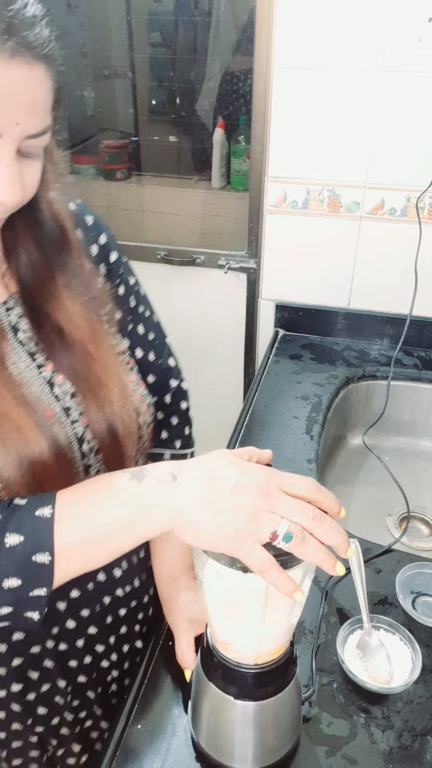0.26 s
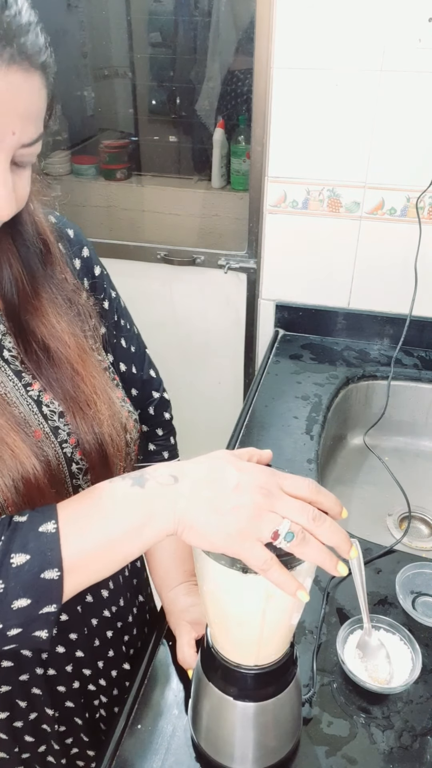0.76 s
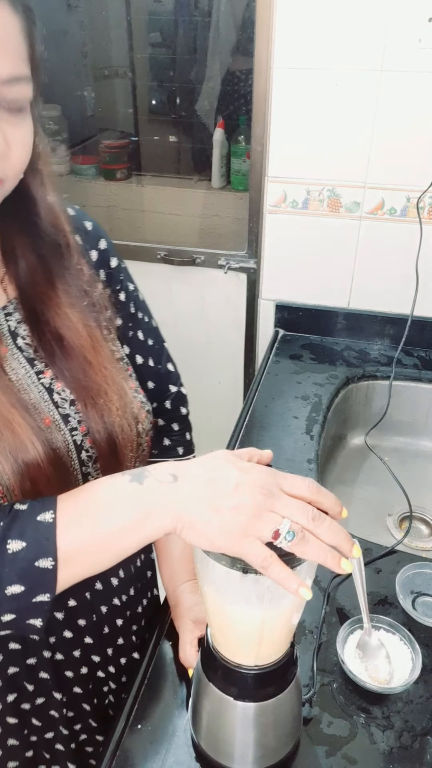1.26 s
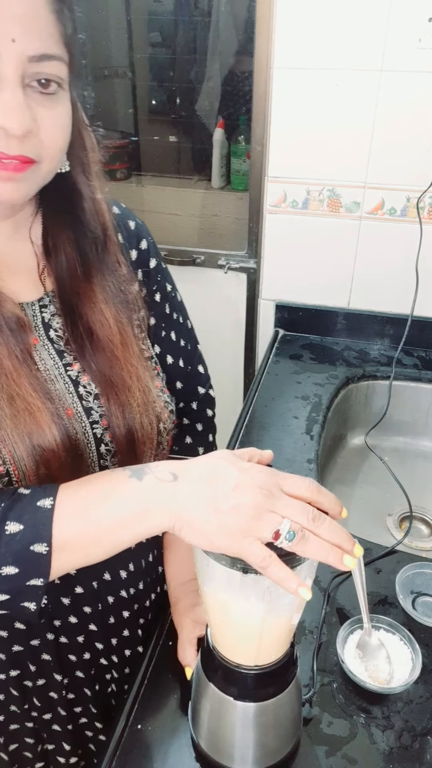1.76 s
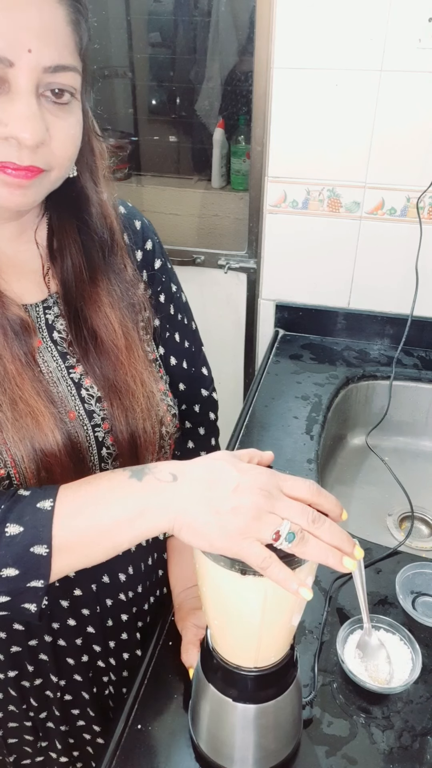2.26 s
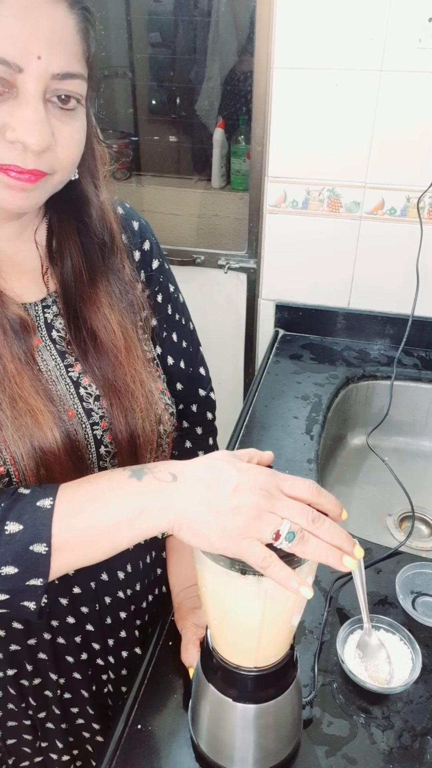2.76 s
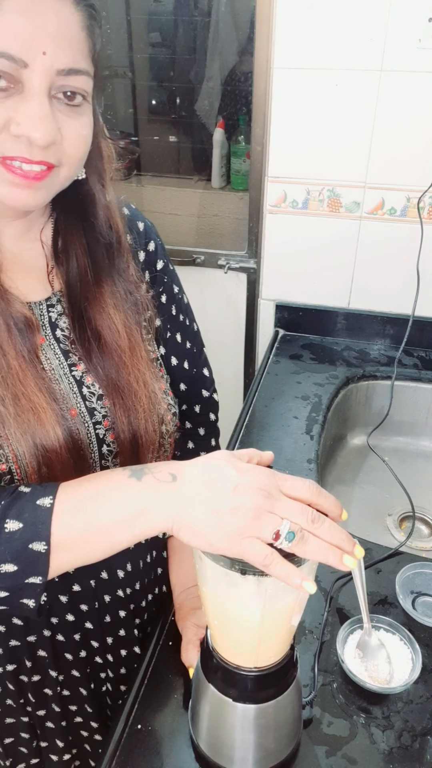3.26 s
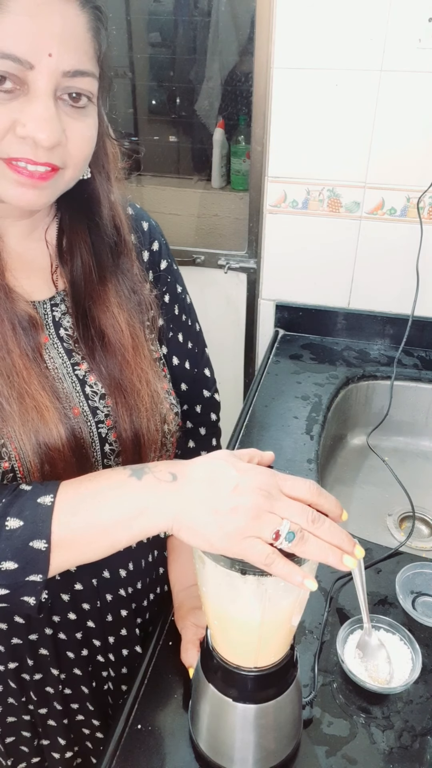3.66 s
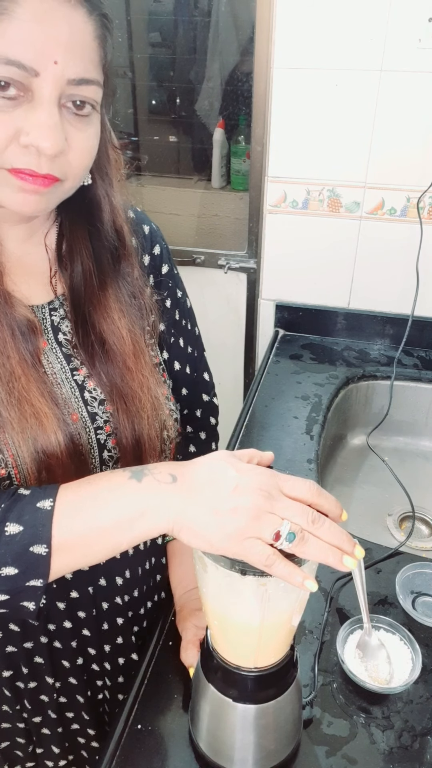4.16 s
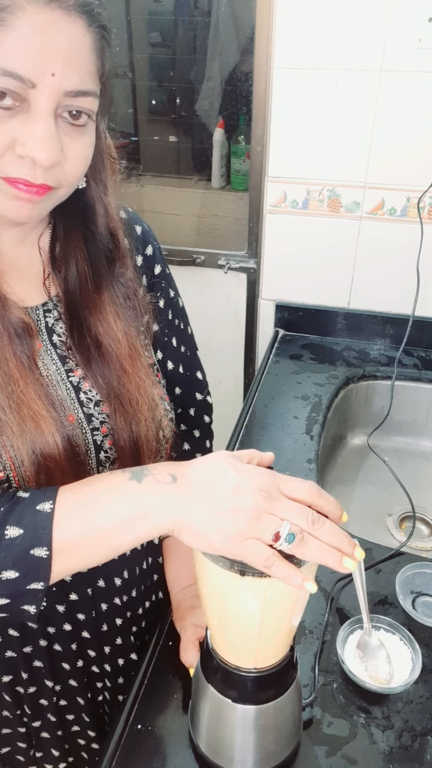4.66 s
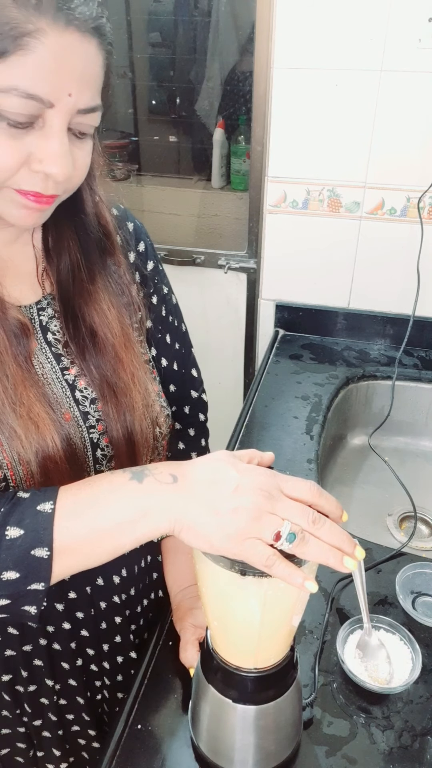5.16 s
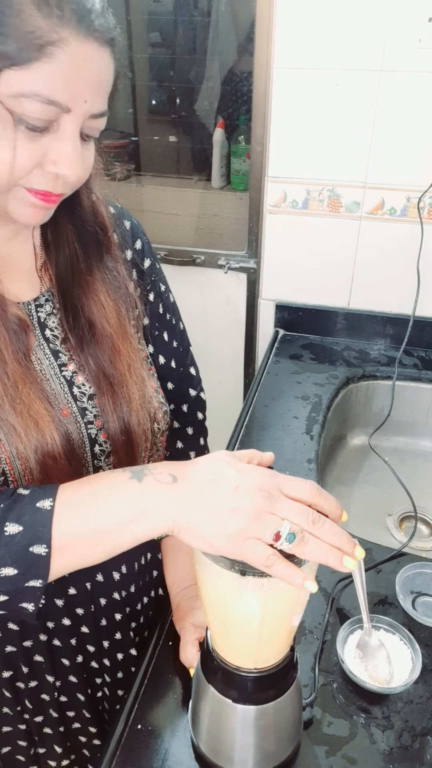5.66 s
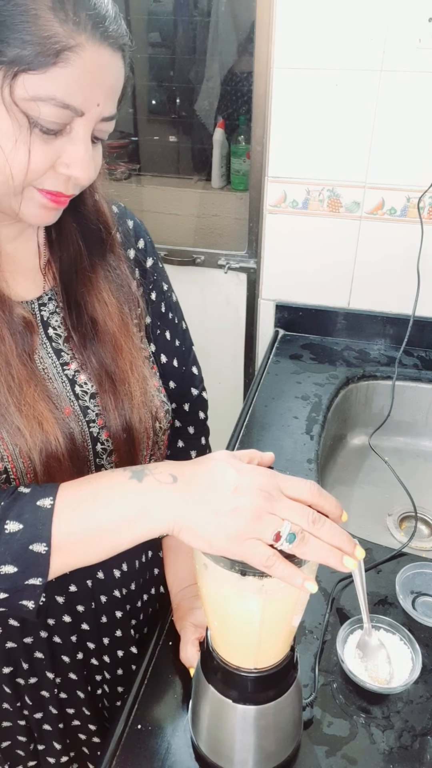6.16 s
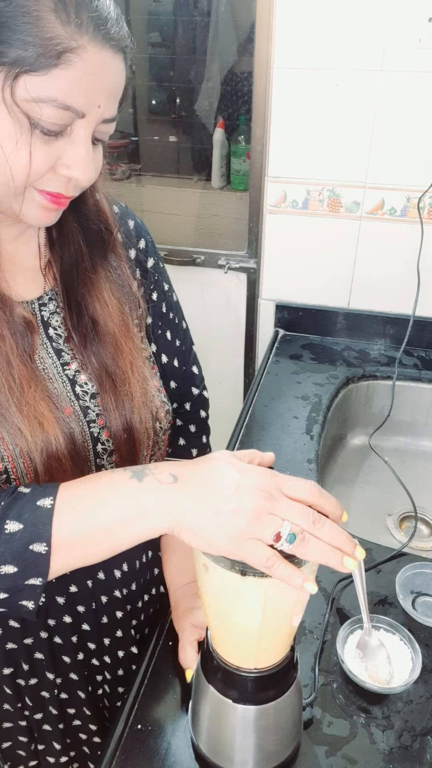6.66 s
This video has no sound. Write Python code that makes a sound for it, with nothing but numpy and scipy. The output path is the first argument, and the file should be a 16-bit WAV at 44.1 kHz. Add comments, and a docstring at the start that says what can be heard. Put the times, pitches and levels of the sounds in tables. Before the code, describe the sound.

Repeated bursts of a blender: gritty, liquid roar with a whining motor, lumps knocking the jar, and rumbling coast-downs between presses.

```python
"""In a small tiled kitchen a blender on a stone counter is switched on five times, coasting after each press.
The shaft hums and whines at multiples of its speed; the blades churn the jar as surging, coloured noise.
Lumps knock the jar wall as short bursts, the loose base rumbles and lands with dull rings, the fan hisses.
Tile echoes and a faint house murmur lie behind; two microphone ports stand a few centimetres apart."""
import sys
import numpy as np
from scipy import signal
from scipy.fft import rfft, irfft, next_fast_len
from scipy.io import wavfile
from scipy.ndimage import uniform_filter1d

SR = 44100
rng = np.random.default_rng(int(sys.argv[2]) if len(sys.argv) > 2 else 0)


def unload_audio(sound):
    """Save the sound as a 16-bit wav file, at the path given as the first command line argument."""
    columns = np.transpose(np.atleast_2d(sound))
    # keep every value between -1 and 1, then stretch to whole-number steps
    steps = np.round(np.clip(columns, -1, 1) * 32767)
    wavfile.write(sys.argv[1], SR, steps.astype(np.int16))


N = 304731

# Shaft speed while the switch is held, one table a press. Each row: time in seconds, speed in turns per s.
SHAFT_SPEED = [
    [(0.6, 50), (0.74, 145), (0.79, 188), (0.88, 200), (0.95, 196), (1.04, 202), (1.16, 209), (1.21, 225)],
    [(2.05, 61), (2.16, 123), (2.3, 162), (2.39, 223), (2.46, 194), (2.58, 224), (2.86, 235), (2.95, 225),
     (2.99, 214), (3.11, 223)],
    [(4.335, 60), (4.44, 95)],
    [(4.65, 56), (4.71, 130), (4.79, 163), (4.9, 212), (5.0, 223), (5.16, 232), (5.53, 235), (5.83, 230),
     (5.99, 236), (6.04, 224)],
    [(6.855, 57), (6.91, 120)],
]
# Drag of the coasting shaft. One value a press: share of the speed lost per turn.
COAST_DRAG = [.014, .016, .012, .012, .012]
# Load offsets, one row a press: base under power, base coasting, fan under power, fan coasting,
# counter under power, counter coasting, all in dB added to the part levels.
PRESS_LOAD = [(1, 5.73, 1, 0, 2, 6.5), (0.21, 0.099, 0, 0.0023, 0.5, -1.5), (1, -1.5, 0, 0, 5, -2.5),
              (-0.5, -1.9, 1.5, 0, 0, -3.5), (-5.5, 0, -1, 0, -7, 0)]
# Parts under power. Each row: speed in turns per s, then base rumble, fan hiss, counter thrum, cup ring,
# lid ring and shaft hum, in dB over the churn before load offsets and trims.
POWERED_PARTS = [(50, -3, -0.62, -21, -14.5, 10.5, -21), (85, 7, 0.55, -12, -20, -13.5, -14.5),
                 (111, 9, 0.24, -8.5, -18.5, -26, -11.5), (147, 5, -1, -7, -17.5, -11.5, -15.5),
                 (173, 1.5, -5.7, -12, -14.5, 1, -17.5), (202, -13, -1.8, -24, -16, -12.5, -20),
                 (232, -4.5, -0.074, -26.5, 0, -13.5, -15.5)]
# Parts while coasting. Each row: the same columns in the same units.
COASTING_PARTS = [(50, 8, -16, 3, -25, -14, -14), (70, 7.5, -9, -2, -30, -20, -15.5),
                  (86.4, 6.5, -3, -3.5, -25, -7, -23), (110, 8.5, -1.5, -9.5, -27, 3, -10),
                  (135, -2.5, -3.5, -17, -28, -5, -30), (155, -3, -3.5, -22.5, -24, -2.5, -22),
                  (173.5, -11, -3, -28, -22, -6, -10.5), (225, -3, 2, -35, -15.5, -7, -19)]
# Whine swells. Each row: centre in seconds, third multiple in dB, fifth multiple in dB, before the speed fade.
WHINE_SWELLS = [(0.8, -44.5, -35), (0.879, -41, -54), (0.96, -27.5, -30.5), (1.038, -39, -37),
                (1.162, -37, -32), (2.39, -36.5, -56), (2.46, -35, -50), (2.69, -21, -26.5),
                (2.949, -26, -27), (3.022, -25.5, -48), (3.11, -30.5, -25), (5.0, -29, -34),
                (5.08, -33.5, -37), (5.16, -32.5, -34), (5.25, -30, -45), (5.372, -39, -37),
                (5.47, -33, -39), (5.6, -33, -34), (5.69, -29, -40), (5.83, -34, -42), (5.9, -29, -37),
                (5.99, -33.5, -48), (6.07, -30.5, -41)]
# Churn loudness, one table a press with its coasting. Each row: time in seconds, level in dB before the mix.
CHURN_LEVEL = [
    [(0.598, -56), (0.606, -34.5), (0.63, -33.5), (0.69, -23), (0.734, -26), (0.81, -21.5), (0.92, -19),
     (0.968, -16.5), (1.054, -20.5), (1.24, -22), (1.284, -25), (1.412, -26), (1.51, -32), (1.55, -35),
     (1.83, -56.5), (1.85, -52), (2.048, -80)],
    [(2.05, -50.5), (2.07, -23.5), (2.14, -21.5), (2.26, -29), (2.42, -18.5), (2.61, -21.5), (2.67, -19.5),
     (2.78, -23), (2.91, -20), (2.95, -22), (3.06, -19), (3.11, -24.5), (3.22, -20.5), (3.27, -27),
     (3.35, -23.5), (3.49, -33.5), (3.53, -31.5), (3.62, -43.5), (3.75, -47), (3.88, -66.5), (3.93, -54.5),
     (4.0, -70), (4.33, -70)],
    [(4.335, -38.5), (4.346, -25), (4.37, -32.5), (4.438, -26), (4.508, -31), (4.645, -38)],
    [(4.648, -32), (4.655, -24), (4.67, -28.5), (4.71, -25), (4.74, -25), (4.95, -20), (5.02, -22.5),
     (5.09, -19), (5.16, -22), (5.71, -23), (5.85, -20.5), (5.92, -23.5), (6.2, -23), (6.32, -21.5),
     (6.45, -33.5), (6.48, -27), (6.52, -33.5), (6.7, -48.5), (6.74, -43), (6.83, -53), (6.85, -43)],
    [(6.855, -34.5), (6.861, -25.5), (6.91, -24.5)],
]
# Churn spectrum. Each row: frequency in Hz, relative density in dB per Hz.
CHURN_SPECTRUM = [(150, -59.5), (250, -3), (321, -5.5), (692, 3.5), (889, -5.5), (1140, -2), (2390, -5),
                  (3340, -6), (3900, -10), (7000, -33.5), (9100, -60), (15400, -120)]
# Blade tones. Each row: multiple of shaft speed, width in Hz, dB over the churn at full speed.
BLADE_TONES = [(2, 16, -10.5), (8, 28, -10.5), (12, 34, -11.5)]
# Resonances of jar and housing. Each row: frequency in Hz, width in Hz, relative level in dB.
JAR_MODES = [(1080, 60, 11.5), (1810, 310, 4), (2084, 74, 5), (2550, 60, -3), (2946, 80, 7.5),
             (5580, 160, -10)]
# Cup ring swells. Each row: centre in seconds, dB over the churn before trim.
CUP_RING_SWELLS = [(0.83, 1), (0.97, -11), (1.08, -3), (1.166, -3), (1.23, 5), (2.29, -1), (2.42, 3),
                   (2.5, -3), (2.61, 3), (2.7, -9), (2.8, 6.5), (2.88, -0.5), (2.949, -8.5), (3.05, -5),
                   (4.81, -1), (4.9, 4.5), (4.98, -6), (5.07, -1), (5.17, -5), (5.3, 3), (5.45, 0),
                   (5.58, 4.5), (5.71, 1), (5.79, 4), (5.85, -15), (5.95, 10.5), (6.02, 8)]
# Lid ring swells. Each row: centre in seconds, dB over the churn before trim.
LID_RING_SWELLS = [(0.84, 4), (0.97, 7.5), (1.04, 7), (1.24, 1), (1.41, 9), (2.74, -5), (3.2, 3),
                   (3.36, 13), (6.26, 7.5), (6.479, -3)]
# Collar ring swells. Each row: centre in seconds, dB over the churn.
COLLAR_RING_SWELLS = [(0.97, -4.5), (1.08, -3.5), (1.22, -4.5), (2.5, -5.5), (2.7, -14), (2.9, -4.5),
                      (4.96, -6), (5.08, -4), (5.35, -2.5), (5.85, -10)]
# Resonances of the base on the counter. Each row: frequency in Hz, width in Hz, relative level in dB.
BASE_MODES = [(394, 46, 3.5), (545, 470, 4), (688, 34, -23.5)]
# Resonances of the counter slab. Each row: frequency in Hz, width in Hz, relative level in dB.
COUNTER_MODES = [(85, 21, -23), (111.4, 30, 6.5), (161, 17, 1)]
# Cooling fan spectrum. Each row: frequency in Hz, relative density in dB per Hz.
FAN_SPECTRUM = [(2060, -23), (3500, -7.5), (3920, -12.5), (4870, -9.5), (5500, -4), (5860, -10),
                (9140, -13.5), (10600, -13.5), (12200, -10), (14900, -19.5), (16000, -11.5)]
# Lumps hitting the jar. Each row: start in seconds, peak of the jar rattle in dB before the low cut,
# gain of the tick in dB against that peak.
LUMP_KNOCKS = [(0.604, -19, -8), (0.64, -10, -7), (1.403, 1, -23), (1.516, -15, -24), (1.678, -39, -8),
               (1.845, -29, -35), (2.057, -17.5, -22), (3.345, -19, -8), (3.501, -17, -10),
               (3.515, -9.5, -28), (3.634, -23, -30), (3.721, -20.5, -21), (3.856, -41, -9),
               (3.884, -37, -25), (3.91, -48, -20), (3.928, -38, -35), (4.078, -49.5, -26),
               (4.345, -16, -15), (4.588, -6, -36), (4.651, -3, -30), (4.703, -0.5, -40), (4.793, -1, -19),
               (4.965, 7, -14), (6.109, -1, -13), (6.24, -4.5, -28), (6.319, -1.5, -20), (6.471, -28, -21),
               (6.606, -39, -21), (6.641, -22, -38), (6.73, -27, -35), (6.778, -17.5, -41),
               (6.86, -28.5, -12)]
# The base landing on the counter. Each row: start in seconds, peak in dB, pitch in Hz.
BASE_LANDINGS = [(0.605, -22.5, 420), (0.657, -26, 594), (0.691, -15.5, 400), (0.849, -17, 693),
                 (1.009, -25.5, 710), (1.048, -19.5, 706), (1.273, -10.5, 610), (1.343, -17.5, 684),
                 (1.37, -17.5, 613), (1.402, -12.5, 546), (1.422, -14, 548), (1.518, -13.5, 573),
                 (1.681, -30, 530), (1.78, -33.5, 404), (2.064, -21.5, 383), (2.086, -19.5, 560),
                 (2.146, -23.5, 594), (2.468, -15, 629.4), (3.171, -17.5, 680), (3.241, -17, 672),
                 (3.354, -14, 654), (3.419, -10.5, 510), (3.503, -17, 535), (3.563, -25, 600),
                 (3.741, -32, 520), (3.79, -39, 420), (3.911, -40, 430), (3.954, -46, 400),
                 (4.335, -32.5, 393), (4.399, -15, 585), (4.432, -14, 526), (4.646, -38, 622),
                 (4.703, -12.5, 584), (5.48, -21, 707.3), (5.832, -24, 682), (6.29, -15, 629),
                 (6.32, -15, 496), (6.473, -16, 545.4), (6.501, -13.5, 590), (6.861, -17.5, 415)]
# Kitchen echo. Each row: frequency in Hz, gain over the direct sound in dB.
ECHO_GAIN = [(60, -20.5), (300, -20.5), (700, -5), (1500, -1), (16000, -1)]
# Spectrum of the quiet kitchen. Each row: frequency in Hz, relative density in dB per Hz.
QUIET_SPECTRUM = [(15, -51.5), (25, -16), (137, -2), (212, -36.5), (277, 6.5), (317, -22.5), (354, -7),
                  (754, -14), (818, -14), (988, -16.5), (2760, -24.5), (3820, -37), (16000, -44.5)]
# Loudness of the quiet kitchen. Each row: time in seconds, level in dB.
QUIET_LEVEL = [(0.0, -50), (0.4, -47.5), (2.0, -54), (4.3, -55)]
# Left-right likeness of the quiet kitchen. Each row: frequency in Hz, correlation from -1 to 1.
QUIET_LIKENESS = [(60, 0.78), (240, 1), (950, -0.065), (3770, -0.13), (15000, -0.11)]
# Parts heard by one port only. Each row: frequency in Hz, gain in dB before trim.
ONE_PORT_GAIN = [(60, -26.5), (300, -28.5), (700, -0.5), (1500, 8.5), (5000, 10), (16000, 13.5)]
# Colour difference of the ports. Each row: frequency in Hz, left over right in dB.
PORT_LEAN = [(60, -7.5), (180, 4), (550, -2), (1650, -0.5), (4970, 0.5), (15000, 0.0)]
# Response common to both ports. Each row: frequency in Hz, gain in dB.
PORT_RESPONSE = [(25, -9), (55, -12), (75, -1.5), (16000, -4)]

CUP, LID, COLLAR = (3350, 130), (1549, 210), (1830, 200)  # strong rings of the jar: (Hz, width in Hz)
WHINE_REST_DB = (-16, -16.5)  # third and fifth multiple between swells, over the churn, before the speed fade
WHINE_HALF_S, RING_HALF_S = 0.095, 0.069  # half lengths of the swells
TICK_T60_S, RATTLE_T60_S, THUD_T60_S = 0.012, 0.12, 0.13  # times to fall 60 dB
LEFT_LAG = 7  # samples by which the left port hears the source later
CEILING, EDGE_HZ = 0.95, 15650  # level where peaks round off, band limit


def motor():
    """Speed follows each press, then falls by drag; returns speed, power (0-1) and three load offsets in dB."""
    t, state = np.arange(N) / SR, np.zeros((5, N))
    for rows, load, drag in zip(SHAFT_SPEED, PRESS_LOAD, COAST_DRAG):
        s, turns = np.transpose(rows)
        held, on, since = np.interp(t, s, turns), t < s[-1], t >= s[0]
        speed = held / (1 + drag * held * np.maximum(t - s[-1], 0))
        offsets = [np.where(on, powered, coasting) for powered, coasting in zip(load[::2], load[1::2])]
        state[:, since] = np.array([speed, on, *offsets])[:, since]
    return uniform_filter1d(state, 1500)


def parts():
    """Shaft speed sets each part's level over the churn; power blends driven and coasting values."""
    speed, power, *load_db = motor()
    fast, *driven = np.transpose(POWERED_PARTS)
    slow, *coasting = np.transpose(COASTING_PARTS)
    above = [power * np.interp(speed, fast, a) + (1 - power) * np.interp(speed, slow, b)
             for a, b in zip(driven, coasting)]
    above[:3] = np.add(above[:3], load_db)  # base, fan, counter
    return speed, curves(np.concatenate(CHURN_LEVEL))[0], above


def full(speed):
    """Shaft tones stand out only near full speed: 0 at rest, 1 from 215 turns per s."""
    return np.clip(speed / 215, 0, 1)


def shaft(speed, churn_db, above):
    """The turning shaft gives a hum at its speed and whines at its third and fifth multiple."""
    s, *swell_db = np.transpose(WHINE_SWELLS)
    third, fifth = (amp(churn_db + rest) + swells(s, amp(db), WHINE_HALF_S)
                    for rest, db in zip(WHINE_REST_DB, swell_db))
    fuzz = steep(lumpy(28, 3.2), speed, 30)
    tone = np.sin(2 * np.pi * np.cumsum(speed) / SR)
    hum = amp(churn_db + above[5]) * evened(tone + 0.15 * fuzz)
    whines = third * whine(3 * speed, 5) + fifth * whine(5 * speed, 8)
    return full(speed) ** 3 * (hum + whines)


def whine(hz, wander):
    """A tone whose pitch wavers, by wander in Hz, amid a fuzzy skirt of noise."""
    drift = evened(uniform_filter1d(uniform_filter1d(rng.standard_normal(N), 900), 900))
    tone = np.sin(2 * np.pi * np.cumsum(hz + wander * drift) / SR)
    return evened(tone + 0.5 * steep(rng.standard_normal(N), hz, 3 * wander))


def roar(struck, speed, churn_db, above):
    """Churn, blades, jar, base, counter and fan all rise and fall with the loudness of the churn."""
    base_db, fan_db, thrum_db, cup_db, lid_db = above[:5]
    liquid = swept_liquid(struck, speed)
    sound = churn(liquid) + blades(speed) + jar_rings(liquid, cup_db, lid_db)
    sound = sound + base_rumble(base_db) + counter_thrum(thrum_db) + fan_hiss(liquid, fan_db)
    running = np.arange(N) / SR > SHAFT_SPEED[0][0][0]
    return running * amp(churn_db) * sound


def spatter(per_s, spread_db, t60):
    """Loudness that jumps up whenever a bit of fruit is struck, then dies back over t60 seconds."""
    hits = amp(spread_db * np.minimum(rng.exponential(1, N), 3) - 8.0) * (rng.random(N) < per_s / SR)
    return 1 + signal.lfilter([1], [1, -amp(-60 / (t60 * SR))], hits)


def swept_liquid(struck, speed):
    """Blades sweep the liquid once and twice a turn, so its noise beats with the shaft."""
    angle = 2 * np.pi * np.cumsum(speed) / SR
    beat = 1 + 0.17 * np.cos(angle) + 0.074 * np.cos(2 * angle)
    return evened(struck * beat * rng.standard_normal(N))


def churn(liquid):
    """Turbulent liquid is broad noise, coloured further by the modes of the jar."""
    return evened(evened(colour(liquid, CHURN_SPECTRUM)) + amp(-11.0) * evened(ring(liquid, JAR_MODES)))


def blades(speed):
    """Blades give narrow noise bands at multiples of the shaft speed, strong only near full speed."""
    return full(speed) ** 6 * sum(amp(db) * steep(lumpy(16, 1.4), k * speed, w) for k, w, db in BLADE_TONES)


def jar_rings(liquid, cup_db, lid_db):
    """Noise excites the cup, lid and collar resonances, each of which swells at times."""
    cup, lid = amp(cup_db) + ring_swells(CUP_RING_SWELLS), amp(lid_db) + ring_swells(LID_RING_SWELLS)
    rings = amp(-9.0) * cup * steep(rng.standard_normal(N), *CUP)
    rings = rings + amp(-14.0) * lid * steep(liquid, *LID)
    return rings + ring_swells(COLLAR_RING_SWELLS) * steep(liquid, *COLLAR)


def base_rumble(base_db):
    """The base chatters on its feet: surging noise near 595 Hz through the base modes."""
    chatter = steep(lumpy(60, 0.8), 595, 490)
    return amp(base_db - 4.5) * evened(ring(chatter, BASE_MODES))


def counter_thrum(thrum_db):
    """The counter slab resonates to surging low noise."""
    return amp(thrum_db + 3.5) * evened(ring(steep(lumpy(25, 0.4), 110, 140), COUNTER_MODES))


def fan_hiss(liquid, fan_db):
    """The cooling fan's hiss is filtered from the churn's noise, so it shares its beating."""
    return amp(fan_db - 4.0) * evened(colour(liquid, FAN_SPECTRUM))


def knocks():
    """Each lump gives a bright tick and a short rattle through the jar wall."""
    out, t = np.zeros(N + 4000), np.arange(4000) / SR
    fade = amp(-60 * t / TICK_T60_S) + 0.35 * amp(-60 * t / RATTLE_T60_S)
    for (s, db, treble_db), burst in zip(LUMP_KNOCKS, rng.standard_normal((len(LUMP_KNOCKS), 4000))):
        tick = amp(treble_db) * np.diff(burst, prepend=0) * fade
        jar = (ring(steep(burst, 2200, 3000), JAR_MODES) + 5.4 * steep(burst, 3000, 3000)) * fade
        out[round(s * SR):][:4000] += amp(db) * (tick + jar / abs(jar).max())
    return signal.lfilter(*signal.butter(2, 400, "high", fs=SR), out[:N])


def thuds():
    """A short dull ring each time the bouncing base lands."""
    out, t = np.zeros(N + 6000), np.arange(6000) / SR
    envelope = amp(-60 * t / THUD_T60_S) * np.minimum(t / 0.0004, 1)  # 0.4 ms attack
    for (s, db, hz), burst in zip(BASE_LANDINGS, rng.standard_normal((len(BASE_LANDINGS), 6000))):
        thud = steep(burst, hz, 180) * envelope
        out[round(s * SR):][:6000] += amp(db) * thud / abs(thud).max()
    return out[:N]


def kitchen(x, paths=4):
    """Sparse echoes off tiles, other ones at each port, fading steadily round four sets of paths."""
    slots = np.arange(130, 14000, 20)  # samples
    at = slots + rng.integers(0, 20, (paths, 2, len(slots)))
    taps = np.zeros((paths, 2, 14100))
    np.put_along_axis(taps, at, rng.choice([-1., 1.], at.shape), 2)
    hz, t, z = signal.stft(taps, SR, nperseg=256)
    t60 = read([(200, 0.46), (2000, 0.2), (12000, 0.14)], hz)[:, None]  # (Hz, seconds)
    tails = signal.istft(z * amp(-60 * t / t60), SR, nperseg=256)[1]
    turn = (np.arange(N) / SR * 23 - np.arange(paths)[:, None]) % paths  # 23 changes of set per s
    share = np.sin(np.pi / 2 * np.minimum(turn, 2))  # squares sum to one
    echo = signal.fftconvolve((x * share)[:, None], tails / np.linalg.norm(tails[0, 0]), axes=2).sum(0)
    return colour(echo[:, :N], ECHO_GAIN)


def quiet():
    """Faint murmur of house and street: patchy noise whose left-right likeness depends on frequency."""
    frames, hz = N // 256 + 5, np.fft.rfftfreq(1024, 1 / SR)
    a, b, c, d, patches = rng.standard_normal((frames, 513, 5)).T
    patches = evened(uniform_filter1d(uniform_filter1d(patches, 10, 0), 12, 1))
    same = np.clip(read(QUIET_LIKENESS, hz), -1, 1)[:, None]
    left = a + 1j * b
    right = same * left + np.sqrt(1 - same ** 2) * (c + 1j * d)
    z = np.array([left, right]) * amp(read(QUIET_SPECTRUM, hz)[:, None] + 1.2 * patches)
    murmur = signal.istft(z, nperseg=1024, noverlap=768)[1][:, :N]
    return amp(curves(QUIET_LEVEL)[0]) * evened(murmur)


def amp(db):
    """Amplitude of a level in dB."""
    return 10 ** (np.asarray(db) / 20)


def evened(x):
    """Scales to an rms of 1."""
    return x / np.sqrt(np.mean(x ** 2) + 1e-20)


def read(points, hz):
    """Reads a table between its rows on a log frequency axis."""
    f, value = np.transpose(points)
    return np.interp(np.log(hz + 1), np.log(f + 1), value)


def curves(rows):
    """Turns the columns of a timed table into signals."""
    s, *columns = np.transpose(rows)
    return [np.interp(np.arange(N) / SR, s, c) for c in columns]


def colour(x, points):
    """Filters by a spectrum in dB."""
    size = next_fast_len(N)
    gain = amp(read(points, np.fft.rfftfreq(size, 1 / SR)))
    return irfft(rfft(x, size) * gain, size)[..., :N]


def resonate(x, hz, width):
    """One complex pole; for a moving pitch, shift to zero, smooth and shift back."""
    r = np.exp(-np.pi * abs(width) / SR)
    if np.isscalar(hz):
        return 2 * signal.lfilter([1 - r], [1, -r * np.exp(2j * np.pi * hz / SR)], x).real
    turn = np.exp(2j * np.pi * np.cumsum(hz) / SR)
    return 2 * (turn * signal.lfilter([1 - r], [1, -r], x * turn.conj())).real


def steep(x, hz, width):
    """Two equal resonances in a row, for steeper skirts."""
    return evened(resonate(resonate(x, hz, width), hz, width))


def ring(x, modes):
    """Resonances side by side, each at its own level."""
    return sum(amp(db) * evened(resonate(x, hz, width)) for hz, width, db in modes)


def lumpy(per_s, depth_db):
    """Noise whose loudness surges at random."""
    span = int(SR / per_s)
    surge = evened(uniform_filter1d(uniform_filter1d(rng.standard_normal(N), span), span))
    return evened(amp(depth_db * surge) * rng.standard_normal(N))


def swells(times, heights, half_s):
    """A sum of smooth humps."""
    out = np.zeros(N)
    out[np.round(np.asarray(times) * SR).astype(int)] = heights
    return signal.oaconvolve(out, np.hanning(int(2 * half_s * SR)), "same")


def ring_swells(rows):
    """The humps of one jar ring."""
    s, db = np.transpose(rows)
    return swells(s, amp(db), RING_HALF_S)


def scene():
    """Sound common to both ports, sound of each port alone, kitchen echo and quiet murmur."""
    struck, state = spatter(140, 1.9, 0.022), parts()
    both = amp(-4.0) * roar(struck, *state) + shaft(*state) + knocks() + thuds()
    separate = np.array([roar(struck, *state), roar(struck, *state)])
    apart = amp(-6.0) * colour(separate, ONE_PORT_GAIN)
    near = np.array([np.roll(both, LEFT_LAG), both]) + apart
    return near + kitchen(near.mean(0)) + quiet()


def record(dry):
    """The ports cut the deep bass and differ a little in colour; loud peaks round off; then the band limit."""
    hz, db = np.transpose(PORT_LEAN)
    ports = np.array([colour(dry[0], np.c_[hz, db / 2]), colour(dry[1], np.c_[hz, -db / 2])])
    rounded = CEILING * np.tanh(colour(ports, PORT_RESPONSE) / CEILING)
    band = signal.firwin(511, EDGE_HZ, window=("kaiser", 9), fs=SR)
    return signal.oaconvolve(rounded, band[None], "same")


dry = scene()
out = record(dry)
unload_audio(out)
```